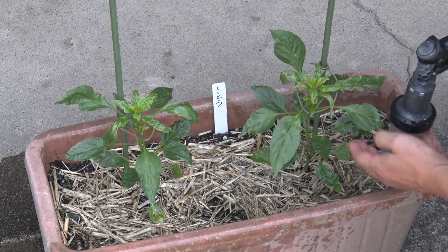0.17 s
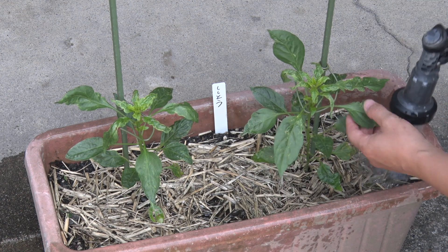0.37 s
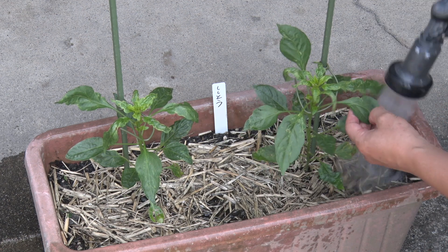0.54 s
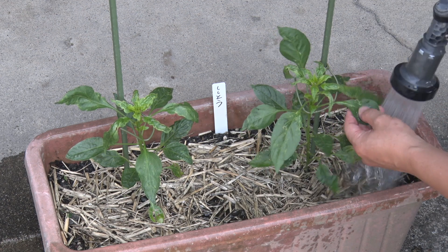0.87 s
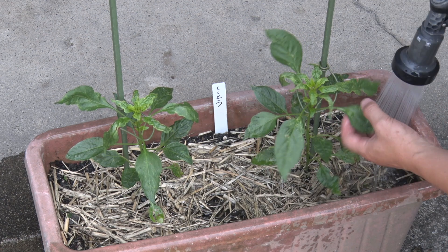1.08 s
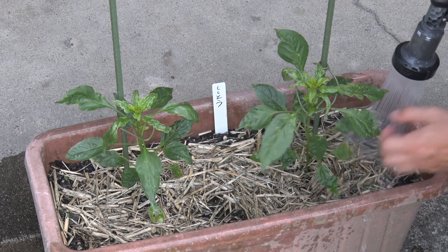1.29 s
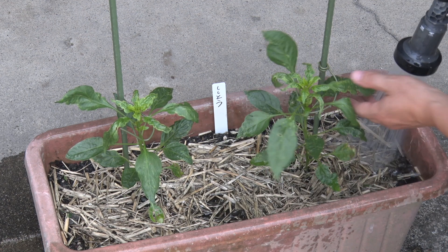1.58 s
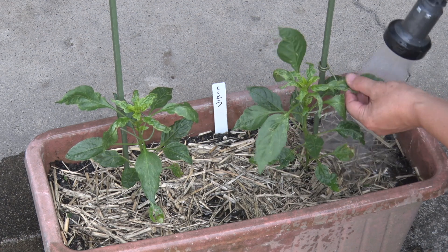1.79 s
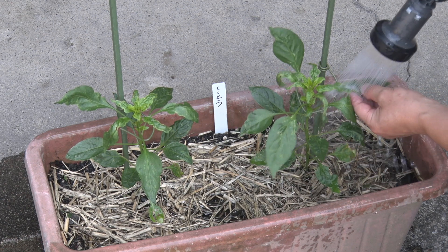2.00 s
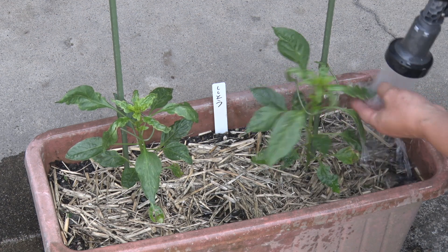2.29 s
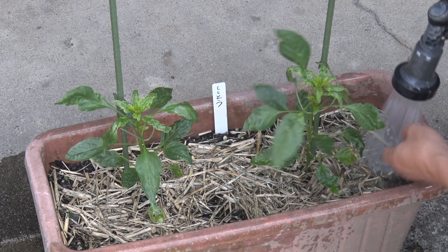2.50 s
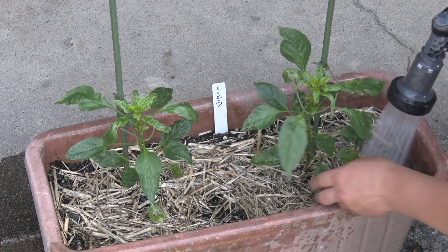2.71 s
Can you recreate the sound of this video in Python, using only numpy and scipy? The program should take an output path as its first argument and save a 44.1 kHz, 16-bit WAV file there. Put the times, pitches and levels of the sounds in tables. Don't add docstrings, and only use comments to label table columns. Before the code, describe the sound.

A hose spray nozzle hisses throughout, close and mono, over a planter on paving. Drops drum softly on straw and soil, thinning around 0.6-1.0 seconds as a hand catches water, fuller from 1.2 to 1.8, weaker near 2.1. The hiss swells around 2.45. Fine mist fizzes, brief watery rings and leaf spatter flicker; a faint high bird peep falls at 2.2 over barely audible hum.

```python
import sys
import numpy as np
from scipy import signal
from scipy.fft import rfft, irfft, next_fast_len
from scipy.io import wavfile
from scipy.ndimage import uniform_filter1d, map_coordinates

SR = 44100
rng = np.random.default_rng(int(sys.argv[2]) if len(sys.argv) > 2 else 0)


def inscribe(sig):
    pcm = np.round(np.clip(np.atleast_2d(sig).T, -1, 1) * 32767)
    wavfile.write(sys.argv[1], SR, pcm.astype(np.int16))


def linear_from_db(decibels):
    return 10 ** (np.asarray(decibels, float) / 20)


N = 125685

# (time [s], hiss level [dB], centre of its hollow [Hz])
NOZZLE = [(0, -42, 4200), (.2, -39.5, 4200), (.55, -39, 3740), (.64, -43, 4570), (.78, -42.5, 4500),
          (.83, -46.5, 4200), (.91, -47, 4000), (.935, -40, 4040), (1.17, -38.5, 3950), (1.3, -42, 4030),
          (1.75, -41.5, 3900), (1.84, -41.5, 4500), (2, -40.5, 4330), (2.14, -42.5, 4100),
          (2.36, -42.5, 3850), (2.45, -38, 4450), (2.7, -39.5, 4100), (2.85, -41.5, 3870)]
# (time [s], drumming level [dB], place [0 = rim and leaves, 1 = hollow of the trough])
LANDING = [(0, -42.5, 0.084), (.13, -44.5, 0.35), (.5, -41.5, 0), (.63, -47.5, 0.38), (.85, -53, .3),
           (.95, -48.5, .4), (1.05, -46, 0.088), (1.17, -42.5, .6), (1.28, -43, 0.7), (1.41, -39.5, 0.44),
           (1.75, -40.5, 0.63), (1.82, -45, .5), (2.05, -46.5, .5), (2.15, -50, 0.077), (2.35, -47.5, 0.27),
           (2.58, -41.5, 0.21), (2.74, -44, .2), (2.85, -41.5, 0.97)]
HEAD_HZ = 3950


def unit(x):
    return x / np.sqrt(np.mean(x ** 2) + 1e-20)


def along(points, hz):
    f, v = np.transpose(points)
    return np.interp(np.log(hz + 1), np.log(f + 1), v)


def curves(rows):
    s, *columns = np.transpose(rows)
    return [np.interp(np.arange(N) / SR, s, column) for column in columns]


def at_time(curve, t):
    return np.interp(t, np.arange(N) / SR, curve)


def wobble(rate):
    return map_coordinates(rng.standard_normal(400), [np.arange(N) * rate / SR])


def filtered(x, response):
    m = next_fast_len(N + 8192)
    return irfft(rfft(x, m) * response(np.fft.rfftfreq(m, 1 / SR)), m)[..., :N]


def shaped(x, gain, patchy_db):
    hz, t, z = signal.stft(x, SR, nperseg=512)
    patches = uniform_filter1d(rng.standard_normal(z.shape), size=5, axis=0)
    patches = uniform_filter1d(patches, size=10, axis=1)
    z = z * gain(hz[:, None], t) * linear_from_db(patchy_db * unit(patches))
    return unit(signal.istft(z, SR, nperseg=512)[1][:N])


def grains(per_s, hz, spread, cycles, share, size):
    count = 9000
    u, g = rng.random((count, 2)), rng.standard_normal(count)
    used = np.arange(count) < per_s * N / SR
    f = np.minimum(hz * np.exp(spread * g), SR / 2.3)[:, None]
    t = np.arange(size) / SR
    strength = used * linear_from_db(-2.0 * np.log(1 - u[:, 1]))
    rings = np.sin(2 * np.pi * f * t) * np.exp(-t * f / cycles) * strength[:, None]
    at = (u[:, 0] * N).astype(int)[:, None] + np.arange(size)
    drops = np.bincount(at.ravel(), rings.ravel(), N + size)[:N]
    share = np.clip(share, 0, 1)
    return np.sqrt(share) * unit(drops) + np.sqrt(1 - share) * rng.standard_normal(N)


def burst(s, length, gain):
    swell = np.cos(np.pi * np.clip((np.arange(N) / SR - s) / length, -.5, .5))
    return swell * unit(filtered(rng.standard_normal(N), gain))


def peak(hz, centre_hz, width_hz):
    return 1 / np.sqrt(1 + (2 * (hz - centre_hz) / width_hz) ** 4)


def nozzle_hiss():
    hiss_db, centre_hz = curves(NOZZLE)

    def hollow(hz, t):
        moving = peak(hz, at_time(centre_hz, t), 1100)
        return peak(hz, HEAD_HZ, 2050) + linear_from_db(-3) * moving

    jet = shaped(grains(2500, HEAD_HZ, 0.243, cycles=3.05, share=0.13, size=256), hollow, patchy_db=1.1)
    return linear_from_db(hiss_db + 0.9 + 0.36 * wobble(17)) * jet


def planter_drumming(flutter):
    # (frequency [Hz], level [dB])
    soil = [(150, -20), (350, -10.5), (450, -7), (600, -2.5), (1250, 4.5), (3000, 0), (6000, -12),
            (12000, -15)]
    # (frequency [Hz], width [Hz], level over the soil [dB])
    rim = [(610, 340, 1.5), (2070, 290, 3.5), (2540, 150, 4)]
    # (frequency [Hz], width [Hz], level over the soil [dB])
    trough = [(620, 150, 3), (1244, 240, 4.2), (1600, 64, 1.8), (1950, 65, 2)]
    land_db, place = curves(LANDING)
    inside = np.clip(place, 0, 1)

    def rings(hz, body):
        return sum(linear_from_db(db) * peak(hz, centre_hz, width_hz) for centre_hz, width_hz, db in body)

    def planter(hz, t):
        body = at_time(inside, t) * rings(hz, trough) + at_time(1 - inside, t) * rings(hz, rim)
        return linear_from_db(along(soil, hz)) * (1 + body)

    drum = shaped(grains(3100, 1700, 0.701, cycles=2.0, share=.18, size=384), planter, patchy_db=0.8)
    return linear_from_db(land_db + 0.2 * flutter) * drum


def mist_fizz(flutter):
    # (frequency [Hz], level [dB])
    fizz_tone = [(500, -16), (2500, -2), (5500, -1), (7200, -3), (8300, -2.5), (10000, -8), (15500, -16.5)]
    hiss_db, land_db = curves(NOZZLE)[0], curves(LANDING)[0]
    fizz_db = -43.5 + 0.15 * (land_db - land_db.mean()) + 0.079 * (hiss_db - hiss_db.mean())
    mist = grains(3000, 8940, 0.57, cycles=1.1, share=0.18, size=64)
    fizz = shaped(mist, lambda hz, t: linear_from_db(along(fizz_tone, hz)), patchy_db=.8)
    return linear_from_db(fizz_db + .5 * flutter + .4 * wobble(9)) * fizz


def spray():
    flutter = wobble(11.23)
    return nozzle_hiss() + planter_drumming(flutter) + mist_fizz(flutter)


def water_pockets():
    pocket_times = [.45, .5, .74, .89, 1.63, 1.93, 2.23, 2.315, 2.6]
    # (length [s], pitch [Hz], width [Hz], level [dB])
    pocket_rings = [
        (.1, 2100, 180, -48.5),
        (0.073, 3450, 600, -39.5),
        (.085, 4650, 550, -38.5),
        (0.022, 4150, 480, -42),
        (0.081, 4350, 440, -42.5),
        (.1, 4450, 600, -40.5),
        (0.079, 8100, 570, -51),
        (0.044, 3550, 430, -36.5),
        (0.13, 2010, 300, -45),
    ]
    out = np.zeros(N)
    for s, (length, hz, width_hz, db) in zip(pocket_times, pocket_rings):
        out += linear_from_db(db) * burst(s, 2 * length, lambda f: peak(f, hz, width_hz))
    return out


def leaf_spatter():
    gust_times = [.08, 1.02, 1.17, 1.6, 2.04, 2.26, 2.46, 2.62]
    # (length [s], level [dB])
    gusts = [
        (.12, -57),
        (.08, -53),
        (.15, -58),
        (0.22, -53),
        (.04, -57),
        (0.061, -55),
        (0.2, -49),
        (0.14, -56),
    ]
    # (frequency [Hz], level [dB])
    leaf_tone = [(3000, -9), (6500, -6), (9500, 1), (13000, -4), (15800, -12)]
    t = np.arange(N) / SR
    swell = sum(linear_from_db(db) * np.exp(-((t - s) / length) ** 2 * 2)
                for s, (length, db) in zip(gust_times, gusts))
    rattle = filtered(grains(900, 10000, 0.37, cycles=1.3, share=0.39, size=48),
                      lambda f: linear_from_db(along(leaf_tone, f)))
    return swell * unit(rattle)


def echo(f):
    # (delay [ms], gain [ratio], phase lag [rad])
    bounces = [
        (3.111, 0.41, 0.62),
        (6.16, 0.033, 1.43),
        (1.44, 0.063, 0.072),
    ]
    low = 1 / (1 + (f / 2150) ** 8)
    paving = sum(g * np.exp(-1j * (2 * np.pi * f * ms / 1000 + lag)) for ms, g, lag in bounces)
    jet_delay_ms = 3.2
    rim = -0.31 * np.exp(-2j * np.pi * f * jet_delay_ms / 1000) / (1 + (f / 5000) ** 4)
    return 1 + low * paving + (1 - low) * rim


def bird_peep():
    start_s, length_s = 2.172, .055
    u = np.clip((np.arange(N) / SR - start_s) / length_s, 0, 1)
    phase = 2 * np.pi * np.cumsum(8600 - 450 * u ** 2) / SR
    return linear_from_db(-52) * np.sin(np.pi * u) * np.sin(phase)


def machine_hum():
    # (frequency [Hz], rms level [dB])
    tones = [(60.7, -76), (84, -70.5), (108, -76.5)]
    t = np.arange(N) / SR
    return sum(np.sqrt(2) * linear_from_db(db + 1.0 * wobble(5.85)) * np.sin(2 * np.pi * hz * t + 0.43 * wobble(2.9))
               for hz, db in tones)


def air_noise():
    # (frequency [Hz], level [dB per Hz])
    air_tone = [(30, -45), (50, -30), (100, -14.5), (200, -8), (380, -1), (600, -8), (1200, -60)]
    return linear_from_db(-64) * unit(filtered(rng.standard_normal(N), lambda f: linear_from_db(along(air_tone, f))))


def scene():
    water = spray() + water_pockets() + leaf_spatter()
    mono = linear_from_db(-0.79) * filtered(water, echo) + bird_peep() + machine_hum() + air_noise()
    return np.array([mono, mono])


def channel_slips():
    # (time [s], low edge [Hz], high edge [Hz], level [dB])
    slips = [
        (0.434, 5200, 6500, -48),
        (.433, 8200, 10900, -52),
        (.433, 14300, 15900, -58),
        (.665, 10900, 13200, -62),
        (1.339, 4100, 6300, -46),
        (1.5, 6230, 7700, -53),
        (2.291, 4480, 5900, -54),
        (2.755, 13700, 15900, -71),
        (2.8, 11600, 15900, -61),
    ]
    return sum(linear_from_db(db) * burst(s, .03, lambda f: (f > low_hz) & (f < high_hz))
               for s, low_hz, high_hz, db in slips)


def roll_off(x):
    return signal.sosfilt(signal.butter(12, 16310, fs=SR, output="sos"), x)


def record(dry):
    low_cut_hz, top_hz = 42, 15780
    parted = dry + channel_slips() * np.array([[1], [-1]])
    mic = filtered(parted, lambda f: (f < top_hz) * f ** 4 / (f ** 4 + low_cut_hz ** 4))
    return roll_off(mic)


dry = scene()
out = record(dry)
inscribe(out)
```